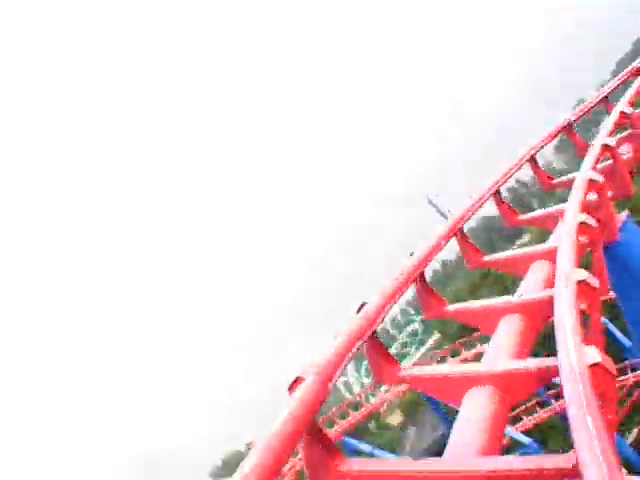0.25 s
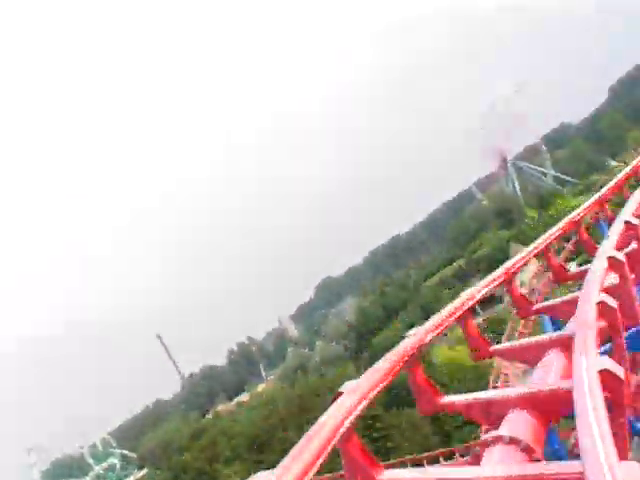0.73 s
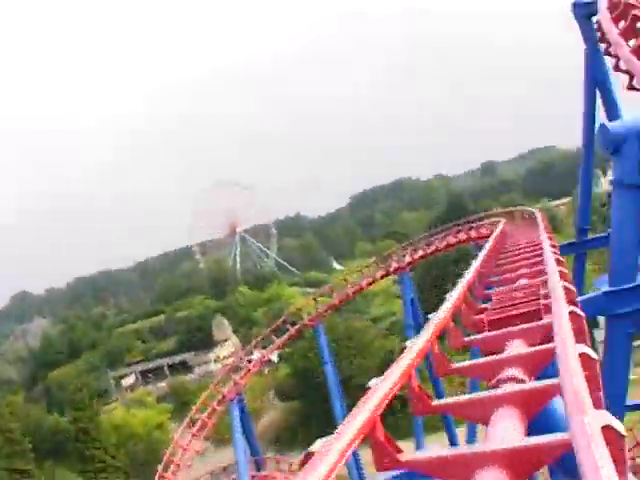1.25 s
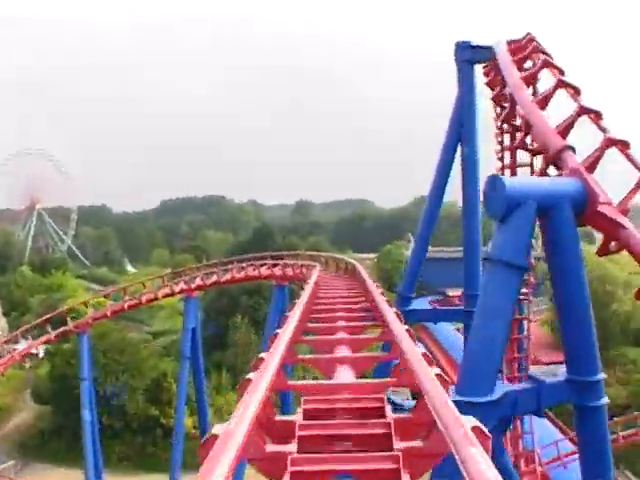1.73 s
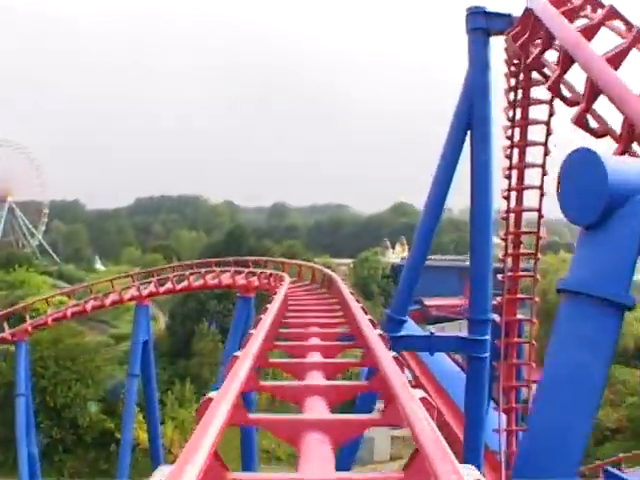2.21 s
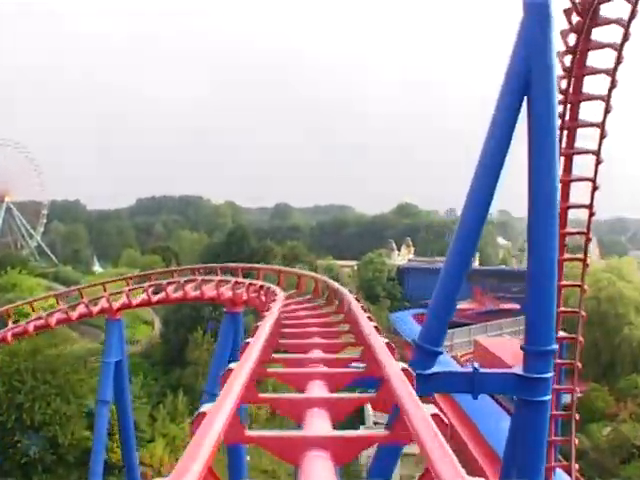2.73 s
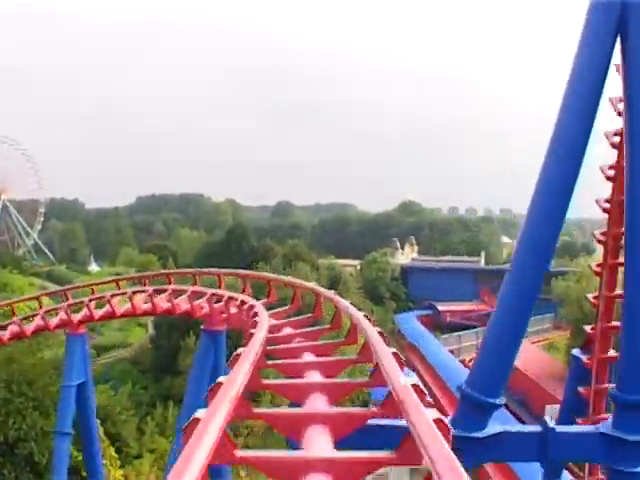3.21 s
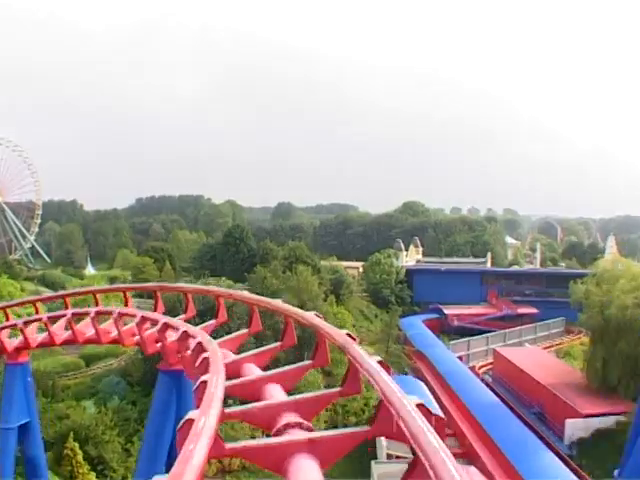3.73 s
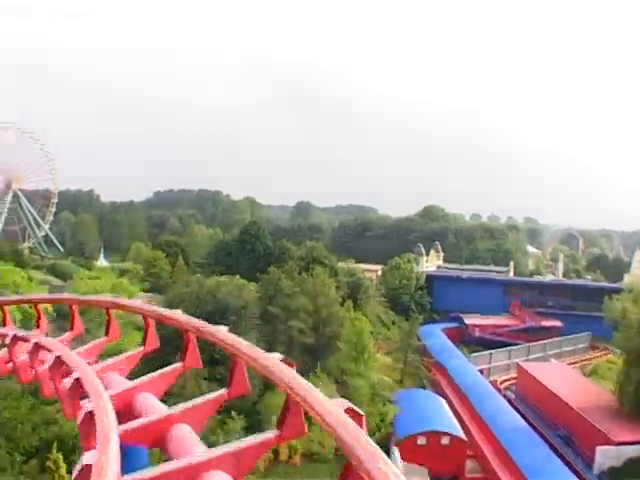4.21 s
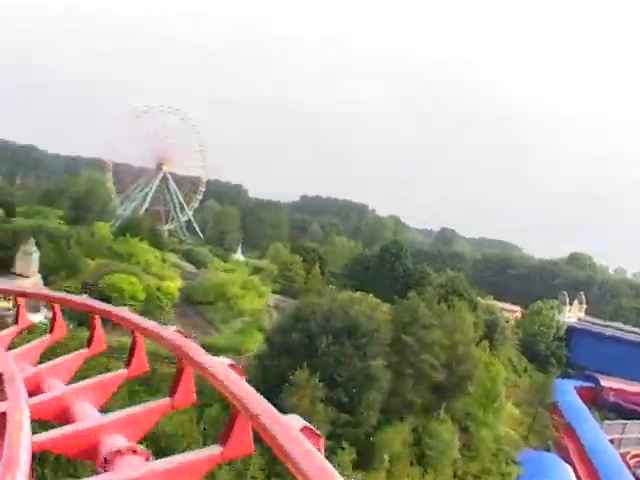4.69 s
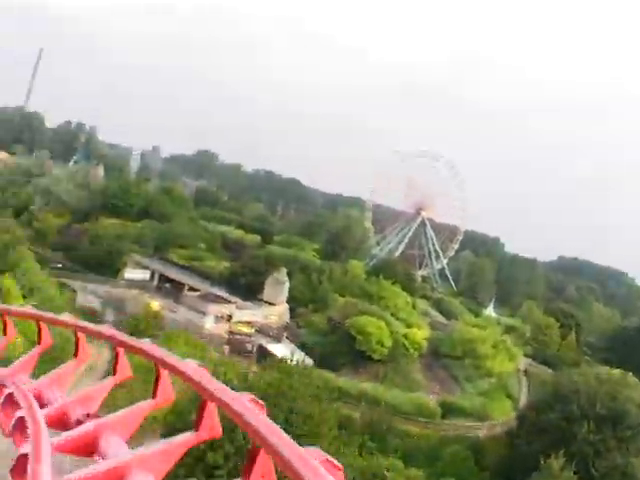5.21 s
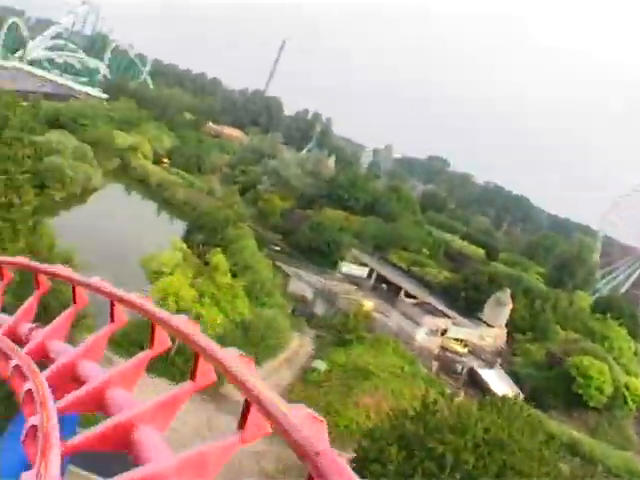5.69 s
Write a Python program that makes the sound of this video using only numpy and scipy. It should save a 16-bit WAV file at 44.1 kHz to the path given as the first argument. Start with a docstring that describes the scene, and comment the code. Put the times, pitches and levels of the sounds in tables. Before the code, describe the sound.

The microphone rides on a steel roller coaster in open air, with no echo. Low, gusty wind buffets it throughout, over the rumble of wheels and a soft hiss of air. A hollow roar at the start fades within a second as the train leaves a curve. Loose metal fittings clack about seven times between 0.3 and 2 seconds, with faint wheel scrubs as the train slows. Wind thumps now and then, hardest at 2 seconds, briefly overloading the microphone. The wheels brush the rail softly around 2.5 seconds. At 4 seconds the train enters another curve and gathers pace: the car swells with a low drone, and the side wheels suddenly start a roar and rasping whine. Short, rough squeals, sizzles and a few tiny snaps of grit come with them, continuing under the wind until the end at about 6 seconds.

```python
"""On board a steel roller coaster. The train leaves a banked curve with a hollow roar, wind buffeting
the microphone, air hissing past, road wheels rumbling on the rails. Loose fittings clack and wheels
scrub as it slows; the strongest eddy overloads the small microphone. On the level crest the guide
wheels brush the rail once. At about 4 s the train leans into the next curve and gathers pace: the car
drones, and the guide wheels press on the rail, roar, whine and sizzle while grit snaps under them."""
import sys
import numpy as np
from scipy import signal
from scipy.fft import rfft, irfft
from scipy.io import wavfile

SR = 44100
rng = np.random.default_rng(int(sys.argv[2]) if len(sys.argv) > 2 else 0)


def log_audio(samples):
    """Write samples as a 16-bit WAV file to the path given in sys.argv[1]."""
    # one column per channel
    frames = np.atleast_2d(samples).T
    # limit to full scale, then quantise
    limited = np.clip(frames, -1, 1)
    pcm = np.round(limited * 32767).astype(np.int16)
    wavfile.write(sys.argv[1], SR, pcm)


N = 262395
TIME = np.arange(N) / SR
FREQS = np.fft.rfftfreq(N, 1 / SR)
GUIDE_TOUCH_S = 3.968
# rim of a wheel that scrubs sideways: pitch_hz, width_hz, level_db
RIM_MODE = (6000, 480, 0)


def undb(db):
    """Decibels to gain."""
    return 10 ** (np.asarray(db) / 20)


def unit(x):
    """Scale to rms 1."""
    return x / np.sqrt(np.mean(x ** 2))


def curve(rows):
    """Gain over time from rows of time_s, level_db."""
    return undb(np.interp(TIME, *np.transpose(rows)))


def bump(centre_s, length_s):
    """A bell of height 1, length_s wide at half height."""
    return .5 ** ((2 * (TIME - centre_s) / length_s) ** 2)


def swell(start_s, length_s):
    """A rounded rise to 1 and a longer fall."""
    age = 4 * np.maximum(TIME - start_s, 0) / length_s
    return age * np.exp(1 - age)


def decay(age_s, t60_s):
    """A tail that falls 60 dB in t60_s."""
    return np.exp(-np.log(1000) * age_s / t60_s)


def noise():
    """White noise."""
    return rng.standard_normal(N)


def walk(rate_hz):
    """Smooth random wander of spread 1."""
    return unit(irfft(rfft(noise()) * np.exp(-(FREQS / rate_hz) ** 2), N))


def wavering_clock(spread, rate_hz):
    """Time that runs unevenly, for tones of unsteady pitch."""
    return np.cumsum(1 + spread * walk(rate_hz)) / SR


def colour(x, points):
    """EQ by rows of freq_hz, gain_db, falling 12 dB an octave beyond the last."""
    hz, db = np.transpose(points)
    gain = undb(np.interp(np.log(FREQS + 1), np.log(hz), db)) / np.maximum(FREQS / hz[-1], 1) ** 2
    return irfft(rfft(x) * gain, N)


def ring(x, modes):
    """Parallel, steep-sided resonances from rows of pitch_hz, width_hz, level_db."""
    out = 0
    for hz, width, db in modes:
        b, a = signal.iirpeak(hz, hz / width, fs=SR)
        out = out + undb(db) * signal.lfilter(b, a, signal.lfilter(b, a, x))
    return out


def pace(growth_db):
    """Gain over time of a source that grows by growth_db for each doubling of speed."""
    # the train slows, then gathers pace: time_s, share_of_starting_speed
    speed = [(0.0, 1.0), (0.3, 0.91), (1.0, 0.86), (1.5, 0.74), (2.4, 0.74), (3.0, 0.73), (4.0, 0.7),
             (4.6, 0.8), (5.3, 0.81), (5.95, 0.98)]
    return undb(growth_db * np.log2(np.interp(TIME, *np.transpose(speed))))


def wind(boom_db=-17.5, flutter_db=-27.5):
    """Large eddies boom on the microphone and sink in the lulls; small ones flutter, louder at speed."""
    # tone of the large and of the small eddies: freq_hz, gain_db
    boom_eq = [(22, -28), (32, -10), (43, -10.5), (52, -9.5), (60, -6.5), (69, 1), (79, 4.5), (97, -0.5),
               (120, -0.5), (145, -4), (172, -6), (200, -19.5), (300, -31.5), (800, -78.5)]
    flutter_eq = [(120, -26.5), (200, 4.5), (270, 0.5), (350, -7.5), (500, -20), (1000, -51.5),
                  (2000, -52.5)]
    # how squarely the microphone faces the wind as the car turns: time_s, boom_gain_db
    exposure = [(0.0, -0.5), (1.2, -0.5), (1.6, 0), (2.2, -1.5), (2.8, -1), (3.7, -0.5), (4.4, -0.5),
                (5.1, 2), (5.95, -2)]
    # the airflow lets go of the microphone: centre_s, depth_db
    lulls = [(0.31, -2), (1.474, -9.5), (1.74, -5.5), (2.809, -2.5), (3.051, -4.5), (3.31, -2),
             (4.001, -5.5), (4.229, -13), (5.08, -1.5)]
    # gusts hit it: centre_s, length_s, boom_gain_db, flutter_gain_db
    gusts = [(1.01, 0.057, 2.5, 5), (1.26, 0.13, 3.5, 4.5), (2.034, 0.063, 2.5, 8.5),
             (2.23, 0.094, 3.5, -2.5), (3.145, 0.044, 3.5, 7), (3.48, 0.092, 6.5, 6.5),
             (3.797, 0.2, 2, 3.5), (4.097, 0.11, 4, 0), (4.489, 0.038, 4, 8), (4.79, 0.096, 5, 4.5),
             (5.161, 0.045, -2, 8.5), (5.28, 0.11, 2, 7)]
    boom = unit(colour(noise(), boom_eq) * undb(-0.07 * walk(12)))
    flutter = unit(colour(noise() * undb(2 * walk(53) + .5 * walk(18)), flutter_eq))
    flow_db = np.interp(TIME, *np.transpose(exposure))
    flow_db += sum(db * bump(at, length_s=.045) for at, db in lulls)
    boom *= undb(boom_db + flow_db + sum(db * bump(at, length) for at, length, db, _ in gusts))
    flutter *= undb(flutter_db + sum(db * bump(at, length) for at, length, _, db in gusts))
    return boom * pace(growth_db=-0.5) + flutter * pace(growth_db=11.5)


def air_rush(flutter_db=1.36):
    """Air streams along the car with a fluttering hiss."""
    # tone of the hiss: freq_hz, gain_db
    hiss_eq = [(600, -4.5), (1100, 9), (1350, 8.5), (1500, 13.5), (1750, 7.5), (2400, 7.5), (3300, 0.5),
               (4500, 2.5), (5400, -7.5), (6200, -6), (6900, -18.5), (7900, -14), (8700, -16), (12000, -18)]
    # its rise and fall: time_s, level_db
    hiss_levels = [(0.0, -64), (1.15, -63), (1.7, -59.5), (2.6, -61.5), (3.1, -62), (3.45, -59.5),
                   (3.9, -60), (4.05, -57), (4.65, -55.5), (4.9, -59.5), (5.95, -64)]
    return unit(colour(noise(), hiss_eq) * undb(flutter_db * walk(30))) * curve(hiss_levels)


def road_wheels(rumble_db=-36, throb_db=-0.2, rough_db=2.0, turn_hz=19, drift=0.067):
    """Rail roughness shakes the car, harder at speed; uneven wheels load it once and twice a turn."""
    # tone of the rumble: freq_hz, gain_db
    rumble_eq = [(120, -5), (300, 2.5), (450, 1.5), (680, -7.5), (950, -10), (1300, -19), (1500, -20),
                 (1750, -22.5), (2500, -31), (4000, -39)]
    turn = 2 * np.pi * np.cumsum(turn_hz * (1 + drift * walk(1.8))) / SR
    load = undb(throb_db * (np.sin(turn) + np.sin(2 * turn)) + rough_db * walk(79))
    return undb(rumble_db) * unit(colour(noise() * load, rumble_eq)) * pace(growth_db=12.5)


def banking(roar_db=-26, rough_db=4.0, ease_s=0.52):
    """The first curve presses the train onto the track: a rough roar that fades as it levels out."""
    # hollow tone of the loaded train: freq_hz, gain_db
    roar_eq = [(130, -13), (210, 5.5), (300, -1.5), (420, -6), (560, -13), (800, -13.5), (1050, -24)]
    roar = unit(colour(noise() * undb(rough_db * walk(79)), roar_eq))
    return undb(roar_db) * roar * bump(0, 2 * ease_s)


def electronics(whine_gain_db=1, hiss_db=-74):
    """The camera's circuits give off a faint, steady whine and hiss."""
    # thin tones of the circuits: pitch_hz, level_db
    partials = [(4350, -78.5), (4500, -89), (4650, -82.5), (4800, -85), (4950, -85), (5100, -85.5),
                (5400, -82), (5700, -86), (5850, -91), (6000, -88.5), (7200, -85.5), (7500, -88),
                (7800, -84.5), (7950, -94.5), (8100, -89), (8850, -93), (9600, -84.5), (10800, -84),
                (10950, -89), (11550, -85.5), (13050, -90.5), (14850, -88.5)]
    tones = sum(np.sqrt(2) * undb(db) * np.sin(2 * np.pi * (hz * TIME + rng.random()))
                for hz, db in partials)
    return undb(whine_gain_db) * tones + undb(hiss_db) * noise()


def eddy_pops(relax_s=0.0035):
    """An eddy bursts on the microphone port: pressure builds, snaps over to suction and relaxes."""
    # a slow snap thumps, a fast one knocks: centre_s, level_db, snap_s
    bursts = [(0.068, -19, 0.00033), (0.1169, -12, 0.00055), (0.235, -13, 0.00047), (2.0389, -3.5, 0.0012),
              (2.342, -22.5, 0.00011), (2.9051, -25, .00009), (3.151, -12, .0008), (3.4718, -16, 0.00014),
              (3.748, -17, 0.00042), (4.775, -18.5, 0.00013), (5.165, -24, 0.00017), (5.224, -24, 0.000068),
              (5.257, -22.5, .00018), (5.282, -22.5, .0003), (5.345, -19, 0.00025)]
    out = 0
    for at, db, snap_s in bursts:
        apart = np.abs(TIME - at)
        pressure = np.sign(at - TIME) * (1 - np.exp(-apart / snap_s)) * np.exp(-apart / relax_s)
        out = out + undb(db) * pressure
    return out


def clacks(buzz_gain_db=-6, clink_gain_db=-6, frame_gain_db=-2, attack_s=0.00051, sag_per_s=3.5):
    """Loose fittings strike the frame, which rings; each buzzes and clinks, its pitch sagging."""
    # couplings and lap bars: start_s, clink_db, t60_s, clink_hz, buzz_db, blow_db
    hits = [(0.334, -35.5, 0.063, 2830, -38.5, -49), (0.562, -53, 0.12, 2840, -36, -46),
            (0.861, -51, 0.13, 3950, -43, -50.5), (1.095, -58, 0.082, 2790, -43, -56),
            (1.494, -51, 0.097, 3880, -35, -38), (1.767, -59, 0.28, 2580, -40, -50),
            (1.94, -61, 0.11, 4100, -38.5, -51)]
    # buzz of the fittings: pitch_hz, width_hz, level_db
    buzz_modes = [(980, 80, 11), (1450, 1000, 3.5), (2130, 150, 0.5), (2650, 390, -1), (3720, 680, -13.5)]
    # free ringing of the steel frame: pitch_hz, level_db, t60_s
    frame_modes = [(942, -1, 0.066), (1260, -8, 0.12), (1680, -10, 0.064), (2060, -8.5, .1),
                   (2310, -10, .06), (2540, -8, .07), (2980, -14.5, .06), (3830, -18.5, 0.1)]
    buzz = unit(ring(noise(), buzz_modes))
    clock, rasp = wavering_clock(.014, 250), undb(3 * walk(200))
    fittings, blows = np.zeros(N), np.zeros(N)
    for start_s, clink_db, t60_s, clink_hz, buzz_db, blow_db in hits:
        age = np.maximum(TIME - start_s, 0)
        shake = np.minimum(age / attack_s, 1) * decay(age, t60_s)
        clink = rasp * np.sin(2 * np.pi * clink_hz * (clock - sag_per_s * age ** 2 / 2))
        fittings += shake * (undb(buzz_gain_db + buzz_db) * buzz + undb(clink_gain_db + clink_db) * clink)
        blows[int(start_s * SR)] = undb(blow_db)
    age = TIME[:SR // 2]
    frame = sum(undb(db) * rng.choice([-1, 1]) * np.sin(2 * np.pi * hz * age) * decay(age, t60_s)
                for hz, db, t60_s in frame_modes)
    return fittings + undb(frame_gain_db) * signal.fftconvolve(blows, frame)[:N]


def scrubs(rim_gain_db=1.5, sizzle_gain_db=5, grit_db=4, lead_s=.002):
    """Short gritty slips of a wheel ring its rim, with a sizzle around it."""
    # slips on the rail: time_s, rim_db, sizzle_db
    slips = [(0.934, -68, -60), (1.19, -61.5, -62), (1.303, -62, -58.5), (1.573, -63, -60),
             (3.977, -57, -65), (4.07, -54, -56.5), (4.197, -60, -60), (4.274, -59, -66), (4.396, -60, -61),
             (4.439, -62, -69), (4.555, -61, -60), (4.613, -65, -57), (4.695, -52, -56.5),
             (4.98, -54, -73.5), (5.1, -56.5, -65), (5.28, -59, -64.5), (5.549, -70, -60),
             (5.63, -56.5, -72), (5.885, -59, -57)]
    # bands of the sizzle: pitch_hz, width_hz, level_db
    sizzle_modes = [(4600, 1400, 4.5), (7800, 1200, -4), (9600, 900, -3.5), (11300, 1000, -4)]
    grit = noise() * undb(grit_db * walk(220))
    rim = undb(rim_gain_db) * unit(ring(grit, [RIM_MODE]))
    sizzle = undb(sizzle_gain_db) * unit(ring(grit, sizzle_modes))
    return sum(swell(at - lead_s, length_s=.045) * (undb(rim_db) * rim + undb(sizzle_db) * sizzle)
               for at, rim_db, sizzle_db in slips)


def guide_load(attack_s=.004):
    """Force of the guide wheels on the rail: one brush on the crest, then sudden, lasting contact."""
    # load through the second curve: time_s, level_db
    curve_load = [(3.98, -42), (4.17, -49.5), (4.28, -46), (4.5, -47), (4.65, -44), (4.95, -46.5),
                  (5.25, -48.5), (5.45, -44.5), (5.95, -44.5)]
    brush = undb(-48) * bump(centre_s=2.56, length_s=0.29)
    return brush + np.clip((TIME - GUIDE_TOUCH_S) / attack_s, 0, 1) * curve(curve_load)


def guide_wheels(ring_db=-6, chirp_db=-29, chatter_db=3.0):
    """The loaded side wheels chatter, roar and ring; in the curve tiny slips keep their rims chirping."""
    # tone of the roar: freq_hz, gain_db
    roar_eq = [(500, -9.5), (900, 9.5), (1200, 7), (1400, -2), (1800, -2), (2000, -5), (2350, -5),
               (3000, -16), (6000, -37)]
    # ringing of the wheels and their carriers: pitch_hz, width_hz, level_db
    wheel_modes = [(902, 110, 6), (1520, 79, -2.5), (1620, 73, -6.5), (1763, 110, -1.5), (6050, 360, -32.5)]
    contact = guide_load() * undb(chatter_db * walk(35))
    roar = unit(colour(noise(), roar_eq))
    ringing = unit(sum(ring(noise() * undb(3 * walk(29)), [mode]) for mode in wheel_modes))
    chirping = unit(ring(noise() * undb(5 * walk(45)), [RIM_MODE])) * (TIME > GUIDE_TOUCH_S)
    return (roar + undb(ring_db) * ringing + undb(chirp_db) * chirping) * contact


def wheel_whine(gain_db=-11.5, drift=.007, jitter=.006, rough_db=4):
    """Each loaded guide wheel keeps up a rasping whine that wanders about its own pitch."""
    # one tone a wheel: pitch_hz, level_db
    wheel_tones = [(1500, 1), (1615, -1), (1760, -7.5)]
    out = 0
    for hz, db in wheel_tones:
        clock = wavering_clock(drift, 10) + wavering_clock(jitter, 150) - TIME
        out = out + undb(db + rough_db * walk(45)) * np.sin(2 * np.pi * hz * clock)
    return undb(gain_db) * unit(out) * guide_load()


def body_drone(level_db=-26, pitch_hz=173.2, width_hz=45):
    """The car's body hums under the side load as it is forced into the second curve."""
    hum = unit(ring(noise(), [(pitch_hz, width_hz, 0)]))
    return undb(level_db) * hum * bump(centre_s=4.15, length_s=1)


def squeals(waver=0.0161, rough_db=4.0):
    """Stick-slip briefly grips harder and the whine swells, rough and unsteady in pitch."""
    # grips of the guide wheels: start_s, level_db, pitch_hz
    grips = [(4.25, -35.5, 1530), (4.53, -36.5, 1520), (4.62, -46.5, 1490), (4.79, -42, 1570),
             (4.89, -41, 1640), (4.95, -39.5, 1490), (5.326, -45.5, 1480), (5.457, -43, 1505),
             (5.595, -39.5, 1502), (5.70, -43.5, 1640), (5.82, -37.5, 1610)]
    clock = wavering_clock(waver, 111)
    tones = sum(undb(db) * swell(start, length_s=.08) * np.sin(2 * np.pi * hz * clock)
                for start, db, hz in grips)
    return tones * undb(rough_db * walk(90))


def grit_ticks(centre_hz=6000, width_hz=7000, t60_s=0.006):
    """A grain of grit cracks under a wheel: a tiny, bright snap."""
    # grains on the rail: start_s, level_db
    grains = [(4.497, -47), (5.147, -49), (5.174, -46), (5.291, -55), (5.321, -57)]
    snaps = sum(undb(db) * (TIME > start) * decay(np.abs(TIME - start), t60_s) for start, db in grains)
    return snaps * unit(ring(noise(), [(centre_hz, width_hz, 0)]))


def scene():
    """Everything rides with the microphone in open air, so there is no echo."""
    air = undb(3) * wind() + undb(5) * air_rush() + eddy_pops()
    rolling = undb(3.5) * road_wheels() + banking() + body_drone()
    guiding = undb(-1) * guide_wheels() + wheel_whine()
    accents = undb(-6) * scrubs() + undb(-5.5) * squeals() + undb(1) * clacks() + grit_ticks()
    return (air + rolling + guiding + accents)[None]


def record(dry, ceiling=0.54, bias=0.017, low_cut_hz=45, top_cut_hz=15700, fade_s=.002):
    """The microphone rounds the strongest gusts, suction first, choking the treble with them."""
    pressure = dry - bias
    rounded = pressure / (1 + (pressure / ceiling) ** 4) ** (1 / 4) + bias
    low_cut = signal.butter(1, low_cut_hz, "high", fs=SR, output="sos")
    top_cut = signal.ellip(10, .1, 80, top_cut_hz, fs=SR, output="sos")
    thinned = signal.sosfilt(low_cut, rounded + electronics())
    fade = np.clip(np.minimum(TIME, TIME[-1] - TIME) / fade_s, 0, 1)
    return signal.sosfilt(top_cut, thinned * fade)


dry = scene()
out = record(dry)
log_audio(out)
```